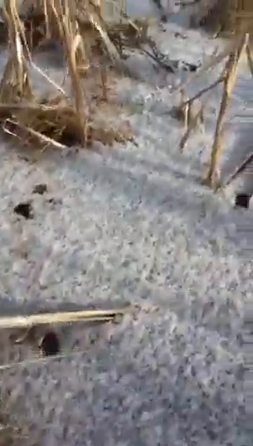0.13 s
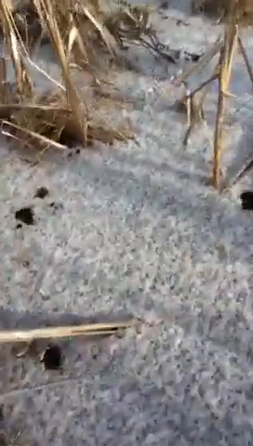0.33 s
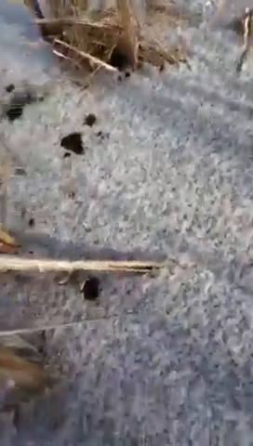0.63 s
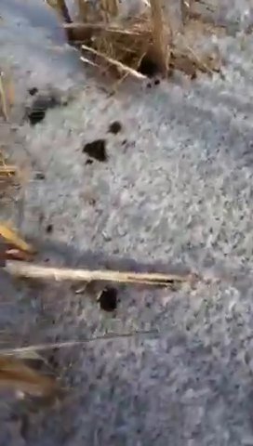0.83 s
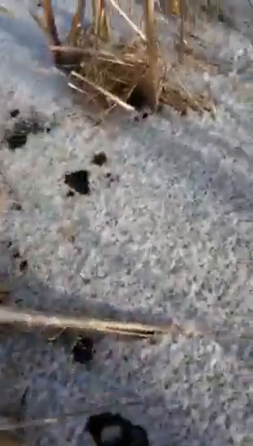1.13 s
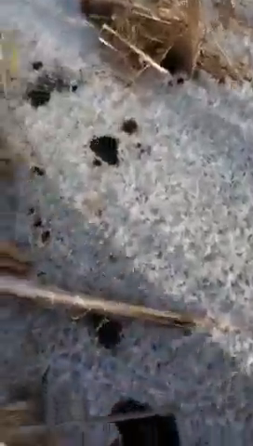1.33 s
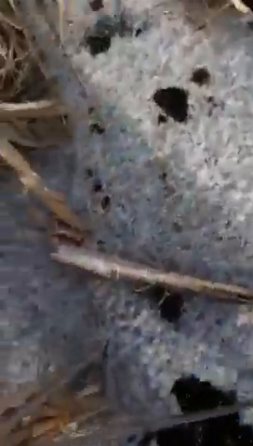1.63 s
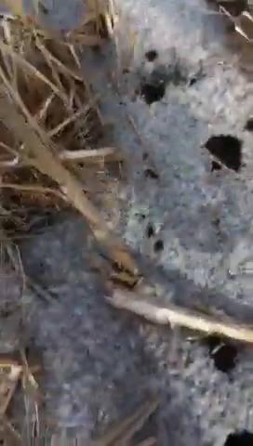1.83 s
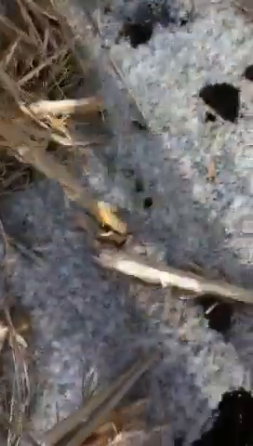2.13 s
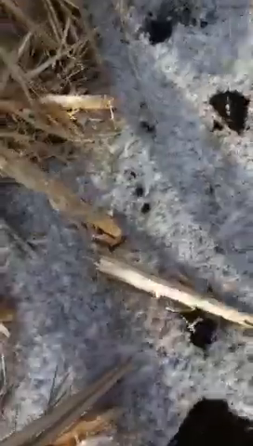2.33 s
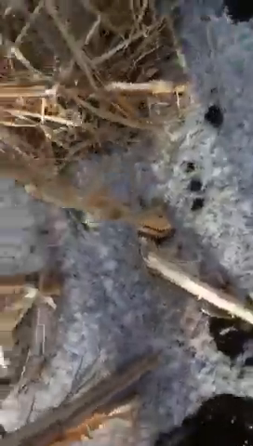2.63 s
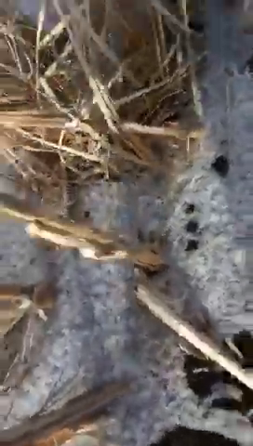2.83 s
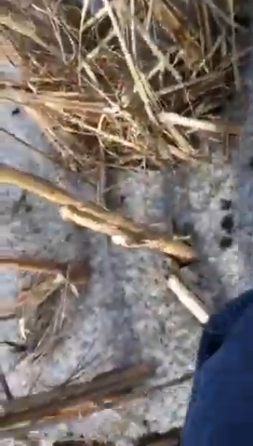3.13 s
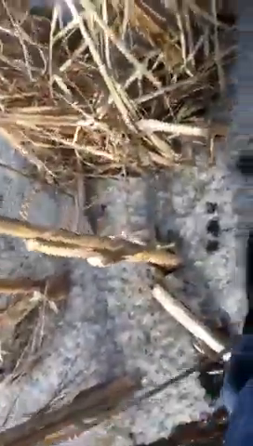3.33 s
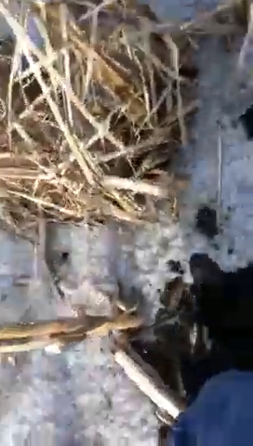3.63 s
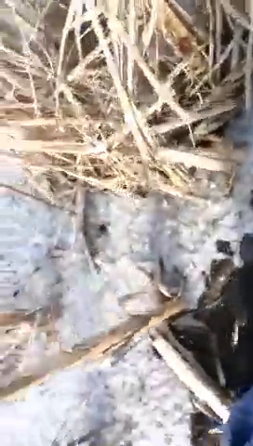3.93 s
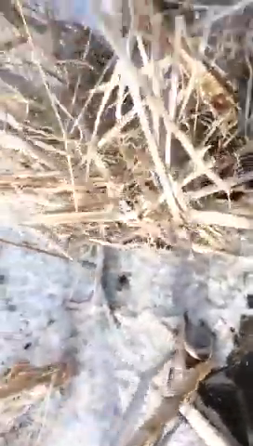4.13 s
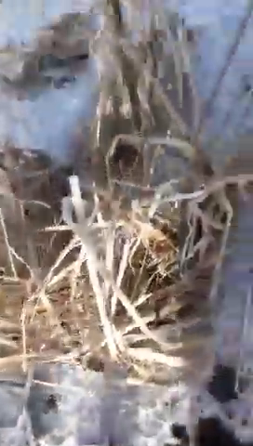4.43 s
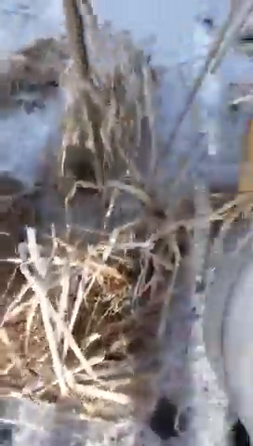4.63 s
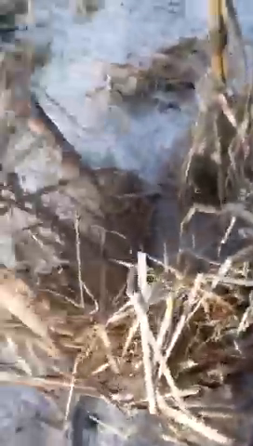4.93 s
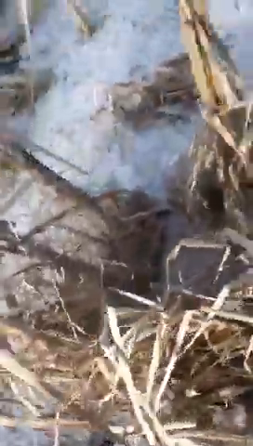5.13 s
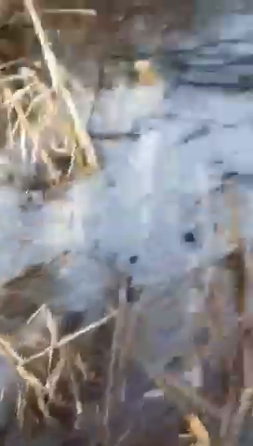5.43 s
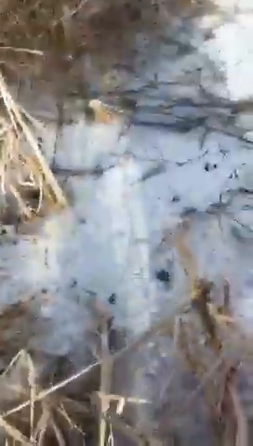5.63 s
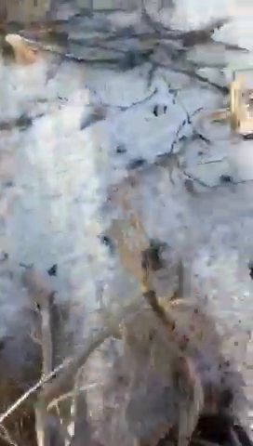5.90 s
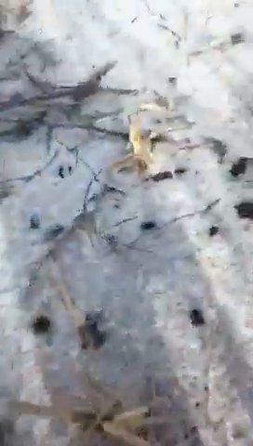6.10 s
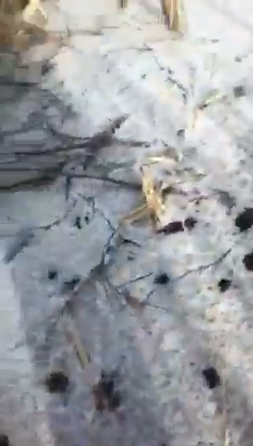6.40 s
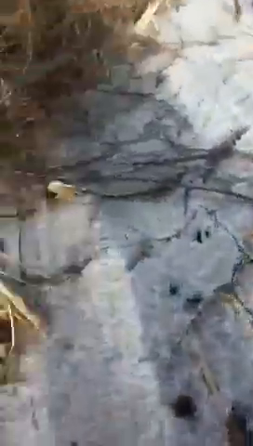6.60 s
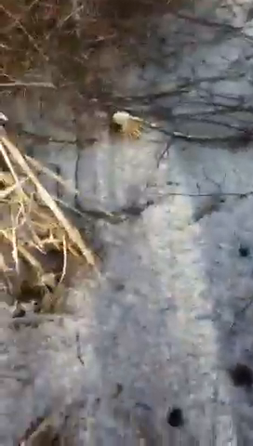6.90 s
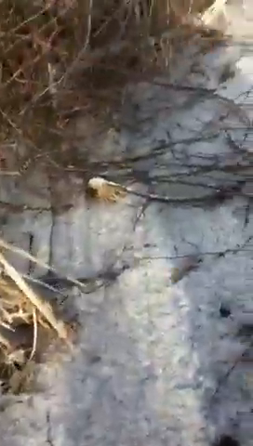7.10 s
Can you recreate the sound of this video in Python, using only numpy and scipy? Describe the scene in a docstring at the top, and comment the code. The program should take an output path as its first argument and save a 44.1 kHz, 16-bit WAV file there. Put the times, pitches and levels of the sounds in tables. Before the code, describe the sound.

Slow boots crunch through crusted snow over thin marsh ice, with sharp cracks, wet slush, small bubbles and dull knocks under a faint hush.

```python
"""Thin marsh ice under crusted snow, crossed in slow steps and heard through a phone.
Each boot crushes the crust: showers of random clicks in shifting resonances, with lone cracks and snaps.
Slush is filtered clicks, froth and noise; bubbles are gliding sines; ice plates knock in decaying modes.
Scuffs are resonated jerks, thumps damped low sines.
Shaped noise gives wind and marsh hush; a thin whine wanders far off."""
import sys
import numpy as np
from scipy import signal
from scipy.fft import rfft, irfft
from scipy.io import wavfile
from scipy.ndimage import uniform_filter1d

SR = 44100
rng = np.random.default_rng(int(sys.argv[2]) if len(sys.argv) > 2 else 0)


def unload_wav(signal):
    """Save mono or channel-first audio to the path in sys.argv[1] as 16-bit WAV at rate SR, clipped to [-1, 1]."""
    wavfile.write(
        sys.argv[1],
        SR,
        np.round(np.clip(np.atleast_2d(signal).T, -1, 1) * 32767).astype(np.int16),
    )


N = 320186
TIME = np.arange(N) / SR

# Footfalls. Each row: start in seconds, dry rustle level in dB, wet slush level in dB.
STEPS = [(-0.03, -34.5, -43), (1.095, -29.5, -28), (2.309, -24.5, -27.5), (3.397, -29, -29.5),
         (4.828, -28, -35.5), (5.829, -19, -35.5)]
# Weight shifts or a leg brushing stalks and snow. Each row: start in seconds, length in seconds,
# dry rustle level in dB, wet slush level in dB.
SHIFTS = [(0.05, 0.11, -37, -40.5), (0.197, 0.16, -40, -47.5), (0.726, 0.079, -45, -45.5),
          (1.892, 0.044, -54, -40), (2.033, 0.07, -82, -49), (2.753, 0.26, -39.5, -60),
          (3.126, 0.07, -46.5, -47.5), (3.273, 0.061, -42.5, -65), (3.563, 0.14, -32, -40.5),
          (4.046, 0.11, -47, -48.5), (4.273, 0.083, -44.5, -42.5), (4.387, 0.47, -44, -50.5),
          (5.112, 0.014, -39, -40), (5.44, 0.025, -39, -42.5), (5.513, 0.07, -31, -39),
          (5.64, 0.3, -42.5, -48), (6.109, 0.027, -34, -34.5), (6.22, 0.034, -35.5, -54),
          (6.763, 0.016, -35, -56), (6.848, 0.11, -36.5, -43), (7.187, 0.046, -45, -47.5)]
FOOTFALL_S, SHIFT_ATTACK_S, SHIFT_RELEASE_S = 0.026, 0.035, 0.066
SETTLE_DB_PER_S, DRAIN_DB_PER_S = 44, 40  # snow settling, slush draining
REST_RUSTLE_DB, REST_SLUSH_DB = -52, -50  # under a standing boot


def stirring(rest_db, step_dbs, shift_dbs, db_per_s):
    """Disturbed ground in dB: footfalls die at one rate; shifts set in, hold and let go; powers add."""
    power = np.full(N, undb(rest_db) ** 2)
    for (start_s, *_), db in zip(STEPS, step_dbs):
        age_s = np.maximum(TIME - start_s, 0)
        onset = np.minimum(age_s / FOOTFALL_S, 1)
        power += (onset * undb(db - db_per_s * age_s)) ** 2
    for (start_s, length_s, *_), db in zip(SHIFTS, shift_dbs):
        first = max(int((start_s - SHIFT_ATTACK_S) * SR), 0)
        span = slice(first, int((start_s + length_s + 10 * SHIFT_RELEASE_S) * SR))
        age_s = TIME[span] - start_s
        onset = np.clip(.5 + age_s / SHIFT_ATTACK_S, 0, 1)
        release = np.exp(-np.maximum(age_s - length_s, 0) / SHIFT_RELEASE_S)
        power[span] += (undb(db) * onset * release) ** 2
    return 10 * np.log10(power)


# Crust collapsing under a boot. Each row: start in seconds, length in seconds, level in dB.
CRUSHES = [(1.093, 0.043, -21), (1.162, 0.016, -27), (2.308, 0.05, -21), (2.365, 0.055, -28),
           (2.42, 0.0067, -28), (2.427, 0.095, -30.5), (3.393, 0.13, -24.5), (4.818, 0.009, -27.5),
           (4.8315, 0.038, -18.5), (5.821, 0.028, -33), (5.857, 0.052, -31), (5.905, 0.028, -20.5),
           (5.935, 0.056, -35)]
# Crushed-crust spectrum. Each row: frequency in Hz, relative density in dB.
CRUNCH_COLOUR = [(59, -19), (100, -10.5), (174, -1.5), (335, -1), (415, -3), (872, -4), (1150, -0.5),
                 (1550, -2), (2080, 0.5), (3470, -0.5), (6840, 0.5), (12400, -5), (16000, -18.5)]


def crunch(rustle_db):
    """Each fracture sets off an avalanche of smaller ones; load adds fractures and cuts sliding."""
    level = undb(rustle_db)
    for start_s, length_s, db in CRUSHES:
        level = level + undb(db) * press(start_s, length_s, edge_s=0.0049)
    load = np.clip(level / undb(-19.5), 0, 1)
    breaks = fractures(70 + 800 * load, spread_db=3.5)
    sliding = .4 + .35 * (1 - load)
    avalanche = steady(smear(breaks, t60_s=.009), .04) + sliding
    # loose bits of ice ring briefly
    chips = pings(1330, 9100, cycles=9.1, rise=0, spread_db=4, count=3000)
    # differencing sharpens the first crack of each avalanche
    ticks = steady(np.diff(breaks, prepend=0), 0.08)
    grains = unit(avalanche * fractures(16000, spread_db=2.5))
    grains = grains + undb(-9.5) * ticks + undb(-6.5 - 22.0 * load) * chips
    grains = steady(scatter(grains, t60_s=0.25, wet_db=-7.0), 0.063)
    hollow = hollows(grains, q=9.3, patchy_db=3.0, rate_hz=45)
    return unit(colour(hollow, CRUNCH_COLOUR)) * level


def hollows(x, q, patchy_db, rate_hz, count=20):
    """Hollows in the snow open and close under the sole: resonances with changing gain, in series."""
    out = x
    for hz in np.geomspace(461, 11750, count):
        gain = undb(patchy_db * np.clip(walk(rate_hz), -2, 2))
        out = out + resonate(out, hz, q) * (gain - 1)
    return out


# Spectrum of snaps and cracks. Each row: frequency in Hz, relative density in dB.
SNAP_COLOUR = [(150, -8.5), (400, -6.5), (1500, -3), (4000, -1), (8000, -2.5), (12000, -10), (16000, -16.5)]
# Crust and stalks snapping. Each row: start in seconds, peak level in dB, ring frequency in Hz.
SNAPS = [(0.1143, -12.5, 8200), (0.149, -10, 11200), (0.759, -31, 2300), (0.855, -21.5, 5700),
         (1.095, -6.5, 3400), (1.118, -4.5, 1800), (1.1625, -9, 2940), (1.184, -15, 1200),
         (1.258, -15, 1450), (1.2707, -18, 5000), (1.304, -11, 4330), (1.3494, -18.5, 3500),
         (1.419, -25, 7940), (1.499, -30, 800), (1.5427, -15, 8700), (1.5738, -20, 2120),
         (1.6047, -11, 3420), (2.3086, -6, 2980), (2.4147, -3, 1880), (2.4229, -12, 7000),
         (2.4432, -7, 3730), (2.4712, -8.5, 2520), (2.5046, -13, 2850), (2.5274, -14, 8000),
         (2.556, -16.5, 2540), (2.6365, -21, 7000), (2.7905, -10, 7800), (2.857, -22, 1560),
         (2.8798, -7.5, 5560), (2.917, -15, 1990), (2.9586, -10, 5450), (3.099, -9, 5370),
         (3.376, -15.5, 5830), (3.4039, -3.5, 4600), (3.435, -7, 6200), (3.453, -11, 3000),
         (3.519, -15, 8000), (3.569, -20, 1780), (3.6955, -19, 9070), (3.7185, -12, 1730),
         (4.6488, -22.5, 9500), (4.8645, -18, 3890), (4.8984, -12.5, 8600), (4.939, -18, 7000),
         (5.114, -13.5, 6760), (5.5638, -12.5, 2000), (5.591, -8.5, 5800), (5.6156, -14, 9050),
         (5.694, -14, 2500), (5.7449, -5.5, 4870), (5.843, -5, 8750), (5.981, -5.5, 2400),
         (6.008, -4, 9600), (6.038, -12, 5040), (6.142, -10.5, 7260), (6.227, -15, 4270),
         (6.2417, -11, 1220), (6.267, -10, 6400), (6.9078, -14.5, 1280), (6.9314, -14, 6700),
         (7.0247, -17.5, 4100), (7.0485, -17, 2550), (7.221, -18, 8000)]


def snaps():
    """A sharp break, a splintering tail and the brief ring of the piece that broke."""
    out = np.zeros(N)
    t, envelope = fade(0.039)
    shape = (np.exp(-t / 0.00061) + 0.33 * envelope) * (1 - np.exp(-t / 0.0002))
    for start_s, db, hz in SNAPS:
        splinters = rng.standard_normal(len(t)) * shape
        snap = colour(splinters, SNAP_COLOUR) + resonate(splinters, hz, q=3.6)
        add(out, start_s + .0003, snap, db)
    tail = smear(out, t60_s=0.047) * rng.standard_normal(N)
    return out + undb(-2.0) * colour(tail, SNAP_COLOUR)


def cracks(rustle_db):
    """Lone brittle cracks follow the rustle level and stop as the crust settles."""
    clicks = scatter(fractures(83, spread_db=3), t60_s=0.042, wet_db=2)
    level = undb(np.minimum(rustle_db, -30) - 6.5)
    gate = np.clip((rustle_db + 49) / 11, 0, 1)
    return unit(colour(clicks, SNAP_COLOUR)) * level * gate


# Slush spectrum. Each row: frequency in Hz, relative density in dB.
SLUSH_COLOUR = [(100, -25), (200, 2.5), (400, 6), (750, 5.5), (1300, 9), (2200, 8), (3500, 4), (7000, -30)]


def slush(db):
    """Squeezed wet snow crumbles in dull hollow lumps and froth; near rest it mostly seeps."""
    froth = steady(pings(600, 4080, cycles=14, rise=0.1, spread_db=3.5, count=5000), .025)
    crumbs = steady(scatter(fractures(700, spread_db=3.5), t60_s=.025, wet_db=-4), .025)
    seep = rng.standard_normal(N)
    grains = unit(hollows(crumbs + undb(-5) * froth, q=4.5, patchy_db=2.6, rate_hz=45))
    squeeze = np.clip((db + 51) / 10, .2, 1)
    mix = np.sqrt(squeeze) * grains + np.sqrt(1 - squeeze) * seep
    return unit(colour(mix, SLUSH_COLOUR)) * undb(db)


# Meltwater bubbles. Each row: start in seconds, reference level in dB, starting pitch in Hz,
# share by which the pitch climbs (negative falls).
BUBBLES = [(0.226, -25, 462, -0.3), (0.545, -28, 886, 0), (0.761, -25, 2070, 0.9),
           (1.345, -22.5, 1386, 0.1), (2.087, -37, 870, 0.05), (2.135, -34.5, 1530, 0.97),
           (3.604, -16, 1750, .1), (3.619, -14, 1265, .35), (3.822, -30.5, 900, -0),
           (4.016, -28.5, 1400, 0.14), (5.166, -13, 1043, 0.03), (5.188, -20, 550, -0.35),
           (5.203, -17, 502, 0.24), (5.253, -24.5, 480, 0.2), (5.685, -24.5, 730, 0.35),
           (6.497, -27.5, 462, 0), (7.082, -23.5, 1510, 0.4)]


def gurgles():
    """Larger bubbles where water wells up through the ice, each opening with a small splash."""
    out = np.zeros(N)
    for start_s, db, hz, rise in BUBBLES:
        life = np.sqrt(800 / hz)  # lower bubbles last longer
        t, envelope = fade(0.032 * life)
        splash = unit(resonate(rng.standard_normal(len(t)), hz, q=1.0)) * envelope
        add(out, start_s, bubble(hz, 0.064 * life, rise), db - 4.5)
        add(out, start_s, splash, db - 2)
    return out


def bubble(hz, t60_s, rise):
    """A decaying ring whose pitch glides by the share rise, as of a bubble nearing the surface."""
    t, envelope = fade(t60_s)
    return np.sin(2 * np.pi * hz * (t + rise * t ** 2 / (2 * t[-1]))) * envelope


# Ice plates knocking. Each row: start in seconds, peak level in dB, pitch ratio.
KNOCKS = [(1.091, -19, 0.71), (1.7268, -3.5, 0.98), (3.464, -18, 0.7), (4.826, -10, 0.64),
          (4.865, -14, 0.92), (5.164, -17.5, 0.56), (5.191, -14.5, 0.83), (5.589, -17, 0.73),
          (5.724, -15.5, 0.8), (5.733, -20, 1.1), (5.743, -17, 0.89), (5.894, -12.5, 0.88)]
# Plate modes. Each row: frequency in Hz at pitch ratio 1, relative level in dB, t60 in seconds.
PLATE = [(451, -2.5, 0.1), (539, 3.5, 0.032), (715, -1.5, 0.038), (1227, -8, 0.045), (1577, -14.5, 0.072),
         (1940, -2.5, 0.05), (2133, -13, 0.046), (2980, -1, 0.015), (3570, -9.5, 0.026)]


def knocks():
    """A plate gives way with a rough push and rings in the water in its own modes."""
    out = np.zeros(N)
    for start_s, db, ratio in KNOCKS:
        ring = np.zeros(SR // 4)
        for hz, mode_db, t60_s in PLATE:
            t, envelope = fade(t60_s)
            mode = envelope * np.sin(2 * np.pi * hz * ratio * t)
            ring[:len(t)] += undb(mode_db) * rng.choice([-1, 1]) * mode
        t = TIME[:len(ring)]
        grit = resonate(rng.standard_normal(len(t)), 1410, q=1) * np.exp(-t / 0.006)
        add(out, start_s, (ring + 3.85 * grit) * (1 - np.exp(-t / 0.00067)), db)
    return out


# Boots scuffing in slush, clothing rubbing. Each row: start in seconds, length in seconds,
# level in dB (energy averaged over the length), resonance in Hz.
SCUFFS = [(0.03, 0.23, -46, 117), (0.094, 0.16, -47, 450), (0.43, 0.073, -38.5, 111),
          (0.754, 0.011, -28.5, 2520), (1.875, 0.085, -37, 215), (1.917, 0.017, -35.5, 1490),
          (2.275, 0.28, -45, 330), (2.754, 0.14, -38.5, 109), (3.393, 0.11, -30, 566),
          (4.17, 0.77, -54, 182), (4.303, 0.02, -33, 1610), (4.33, 0.071, -44.5, 2000),
          (5.166, 0.037, -27, 1830), (5.282, 0.027, -39.5, 270), (5.356, 0.029, -37, 418),
          (5.456, 0.025, -22.5, 230), (5.522, 0.011, -33, 600), (6.502, 0.09, -46, 105),
          (7.147, 0.2, -43, 127)]


def scuffs():
    """Sticking and slipping: uneven little jerks into one broad, soft resonance."""
    out = np.zeros(N)
    jerks = steady(scatter(fractures(1200, spread_db=-1), t60_s=0.0063, wet_db=-4.0), 0.028)
    for start_s, length_s, db, hz in SCUFFS:
        span = slice(max(int((start_s - .02) * SR), 0), int((start_s + 2 * length_s + .1) * SR))
        push = (jerks * press(start_s, length_s, edge_s=0.0076))[span]
        rub = resonate(resonate(push, hz, q=1.2), hz, q=1.2)
        out[span] += undb(db) * rub / np.sqrt(np.sum(rub ** 2) / (length_s * SR))
    return out


# Dull thumps of boot and clothing. Each row: start in seconds, peak level in dB, frequency in Hz,
# t60 in seconds.
THUMPS = [(0.265, -33, 140, 0.054), (.697, -28.5, 223, 0.03), (1.09, -23, 285, 0.019),
          (1.919, -26.5, 290, 0.058), (2.397, -21, 181, 0.13), (2.518, -24.5, 167, 0.15),
          (2.867, -22.5, 155, 0.038), (3.908, -32.5, 320, 0.018), (4.169, -31, 245, 0.017),
          (5.168, -17.5, 195, 0.099), (5.277, -22.5, 270, 0.075), (5.362, -15.5, 190, 0.027),
          (5.376, -16.5, 158, 0.021), (5.4, -25, 129, 0.06), (5.463, -12, 160, 0.027),
          (5.475, -16, 190, 0.037), (5.512, -9.5, 250, 0.011), (5.532, -16.5, 164, 0.032),
          (6.281, -31, 170, 0.14)]


def thumps():
    """Soft blows: a heavily damped low swing with a muffled scuff."""
    out = np.zeros(N)
    muffle = signal.butter(5, [110, 620], "band", fs=SR, output="sos")
    for start_s, db, hz, t60_s in THUMPS:
        t, envelope = fade(t60_s)
        scuff = unit(signal.sosfilt(muffle, rng.standard_normal(len(t))))
        swing = np.sin(2 * np.pi * hz * t)
        add(out, start_s, (swing + 0.31 * scuff) * envelope * (1 - np.exp(-t / 0.0013)), db)
    return out


# Gusts on the microphone. Each row: peak time in seconds, level in dB before flutter,
# rise and fall time constants in seconds.
GUSTS = [(.2, -46, .6, 0.2), (2.85, -43.5, 0.22, 0.094), (5.48, -26.5, 0.079, 0.062), (7.2, -44, 0.25, 0.9)]
# Wind and marsh spectra. Each row: frequency in Hz, relative density in dB.
WIND_COLOUR = [(20, -22), (50, 3), (85, 5), (160, 7), (250, -14), (500, -28), (1200, -76)]
MARSH_COLOUR = [(30, -16), (120, -6), (400, 5), (800, 3), (1200, -18), (1800, -23), (3500, -15),
                (9000, -6.5), (16000, -28)]
BREEZE_DB = -62.5  # wind between gusts, before flutter


def air():
    """Gusts flutter on the microphone over the hush of the marsh and a thin, far-off whine."""
    power = undb(BREEZE_DB) ** 2
    for peak_s, db, rise_s, fall_s in GUSTS:
        power = power + (undb(db) * swell(peak_s, rise_s, fall_s)) ** 2
    flutter = undb(4.0 * np.clip(walk(30), -2, 1))
    wind = unit(colour(rng.standard_normal(N), WIND_COLOUR)) * np.sqrt(power) * flutter
    hush = unit(colour(rng.standard_normal(N), MARSH_COLOUR)) * undb(-54.0 + 0.87 * walk(2.36))
    return wind + hush + whine()


WHINE_HZ, WHINE_WANDER_SHARE, WHINE_DB = 1223, 0.049, -57.5  # dB: tone before flicker


def whine():
    """A thin, airy tone that wanders in pitch and keeps breaking up, in a soft band of its own."""
    phase = 2 * np.pi * np.cumsum(WHINE_HZ * (1 + WHINE_WANDER_SHARE * walk(8))) / SR
    broken = unit(np.sin(phase) * walk(90) + np.cos(phase) * walk(110))
    tone = broken * undb(2 * np.clip(walk(9), -2, 1))
    band = unit(resonate(resonate(rng.standard_normal(N), 1290, q=4), 1290, q=4))
    return undb(WHINE_DB) * (tone + undb(-1.5) * band)


def fractures(rate_hz, spread_db):
    """Random clicks of either sign, with exponentially spread sizes in dB."""
    size = undb(spread_db * np.minimum(rng.exponential(size=N), 5))
    return (rng.random(N) < rate_hz / SR) * size * rng.choice([-1, 1], N)


def pings(low_hz, high_hz, cycles, rise, spread_db, count):
    """Many little ringing things, each with its own pitch, life and size."""
    out = np.zeros(N)
    for when, pitch, size, life in rng.random((count, 4)):
        hz = low_hz * (high_hz / low_hz) ** pitch
        ring = bubble(hz, cycles * (0.4 + life) / hz, rise)
        add(out, when * TIME[-1], ring, -spread_db * np.log(size + 0.0016))
    return unit(out)


def scatter(x, t60_s, wet_db):
    """Ice and stalks nearby throw each click back as a short diffuse tail, never twice the same."""
    return x + undb(wet_db) * smear(x, t60_s) * rng.standard_normal(N)


def smear(x, t60_s):
    """Level of a sound, dying away after every click."""
    energy = fade(t60_s)[1] ** 2
    return np.sqrt(np.abs(signal.oaconvolve(x ** 2, energy / energy.sum())[:N]))


def press(start_s, length_s, edge_s):
    """A push that sets in quickly, holds, then dies away as the last grains settle."""
    out = np.zeros(N)
    span = slice(int((start_s - edge_s) * SR), int((start_s + length_s + 30 * edge_s) * SR))
    t = TIME[span] - start_s
    release = np.exp(-np.maximum(t - length_s, 0) / (edge_s + 0.028 * length_s))
    out[span] = np.clip(.5 + t / edge_s, 0, 1) * release
    return out


def swell(peak_s, rise_s, fall_s):
    """Grows exponentially towards a moment and dies away after it."""
    return np.exp(-np.maximum((peak_s - TIME) / rise_s, (TIME - peak_s) / fall_s))


def walk(rate_hz):
    """Random levels held 1 / rate_hz seconds and slewed; spread near 1."""
    k = int(SR / rate_hz)
    held = np.repeat(rng.standard_normal(N // k + 1), k)
    return unit(uniform_filter1d(held, k)[:N])


def steady(x, span_s):
    """Even out the slow level of a shower of grains and keep its fine grain."""
    size = int(span_s * SR)
    power = uniform_filter1d(uniform_filter1d(x ** 2, size), size)
    return x / np.sqrt(np.abs(power) + 1e-12)


def fade(t60_s):
    """Time axis and envelope of a ring that dies by 60 dB, lasting at least 4 ms."""
    t = TIME[:int(max(t60_s, .004) * SR)]
    return t, np.exp(-np.log(1000) * t / t[-1])


def resonate(x, hz, q):
    """One resonance, gain 1 at its centre."""
    return signal.lfilter(*signal.iirpeak(min(hz, SR / 3), max(q, 1), fs=SR), x)


def colour(x, points, size=4096):
    """Minimum-phase filter with the given (Hz, dB) spectrum, so that clicks keep their sharp front."""
    hz, db = np.transpose(points)
    grid_hz = np.maximum(np.arange(size // 2 + 1) * SR / size, 1)
    gain = undb(np.interp(np.log(grid_hz), np.log(hz), db))
    cepstrum = irfft(np.log(gain))
    cepstrum[1:size // 2] *= 2  # fold to the causal side
    cepstrum[size // 2 + 1:] = 0
    return signal.fftconvolve(x, irfft(np.exp(rfft(cepstrum))))[:len(x)]


def add(track, start_s, sound, db):
    """Mix a sound in at a time and a peak level."""
    i = max(int(start_s * SR), 0)
    track[i:i + len(sound)] += (undb(db) * sound / np.abs(sound).max())[:N - i]


def undb(db):
    """Decibels to gain."""
    return 10 ** (np.asarray(db) / 20)


def unit(x):
    """Scale to rms 1."""
    return x / np.sqrt(np.mean(x ** 2))


def scene():
    """Footfalls and shifts drive crunch, cracks and slush; single events and the air lie on top."""
    _, step_dry, step_wet = np.transpose(STEPS)
    _, _, shift_dry, shift_wet = np.transpose(SHIFTS)
    rustle_db = stirring(REST_RUSTLE_DB, step_dry, shift_dry, SETTLE_DB_PER_S)
    slush_db = stirring(REST_SLUSH_DB, step_wet, shift_wet, DRAIN_DB_PER_S)
    crust = crunch(rustle_db) + snaps() + cracks(rustle_db)
    water = slush(slush_db) + gurgles() + knocks()
    return (crust + water + scuffs() + thumps() + air())[None]


def record(dry):
    """The phone thins the deep bass, rounds the highest peaks and cuts the top."""
    thinned = signal.sosfilt(signal.butter(1, 45, "high", fs=SR, output="sos"), dry)
    rounded = 0.9 * np.tanh(thinned / 0.87)
    return signal.sosfilt(signal.ellip(10, .2, 80, 15900, fs=SR, output="sos"), rounded)


dry = scene()
out = record(dry)
unload_wav(out)
```